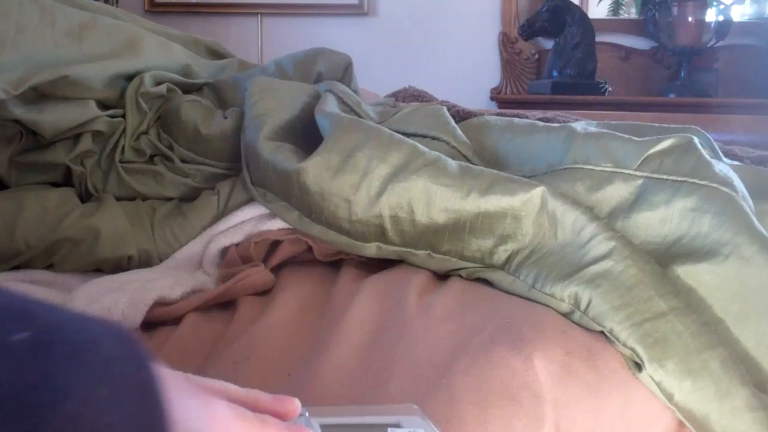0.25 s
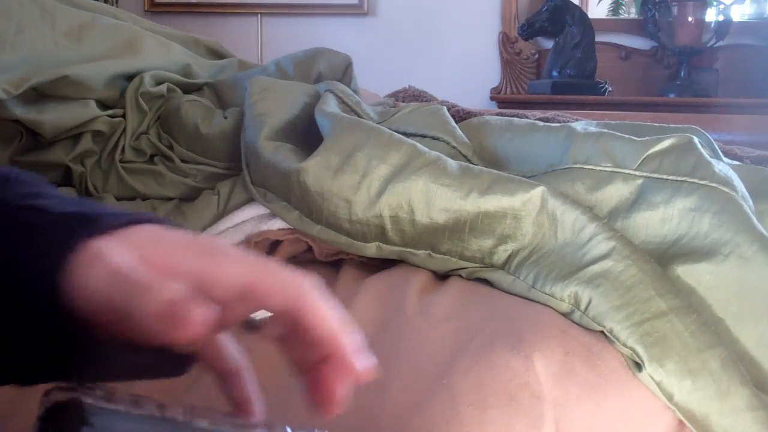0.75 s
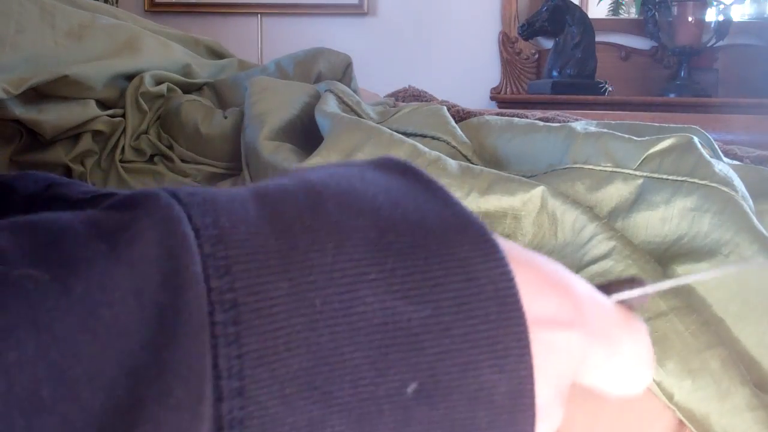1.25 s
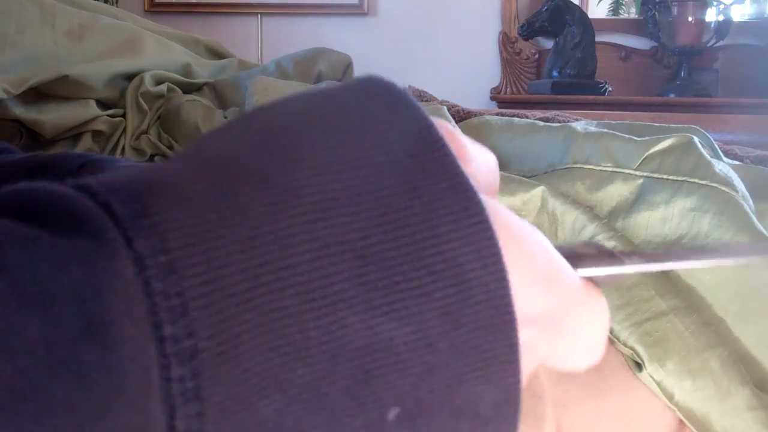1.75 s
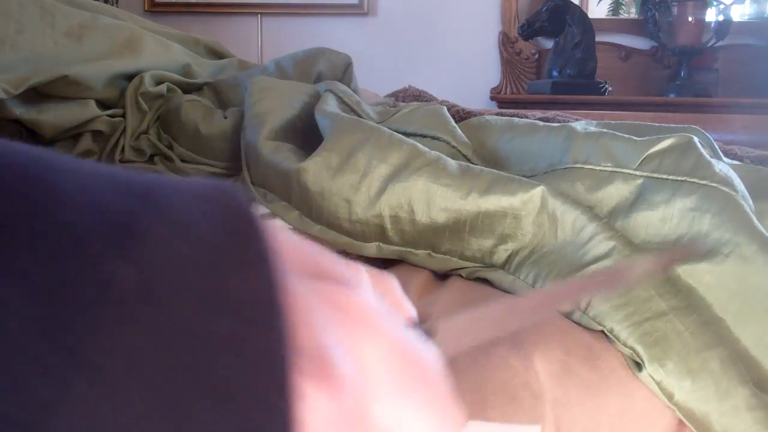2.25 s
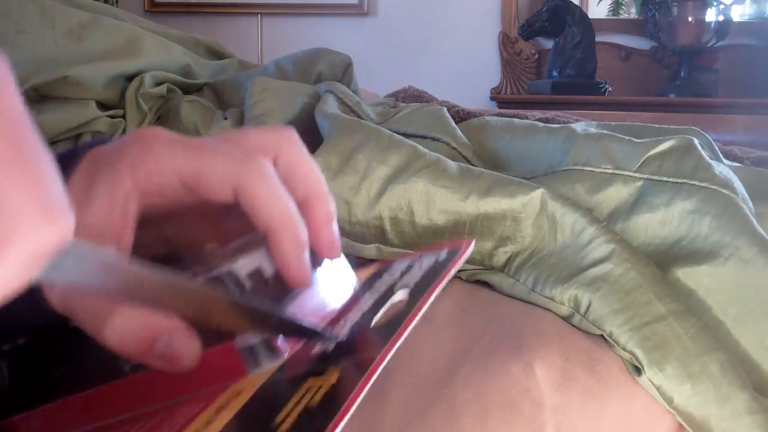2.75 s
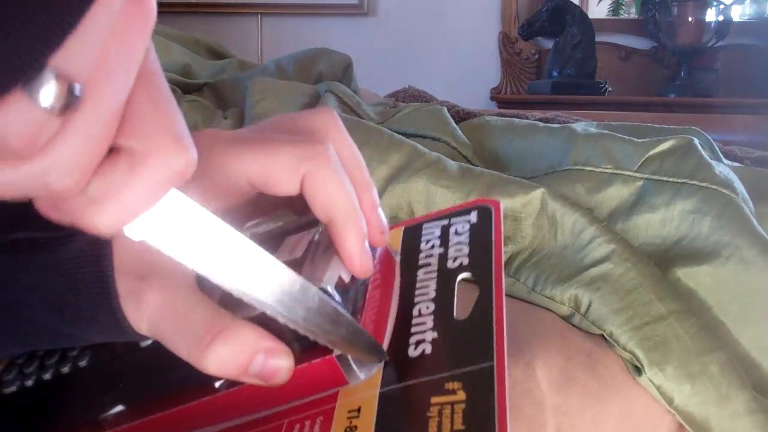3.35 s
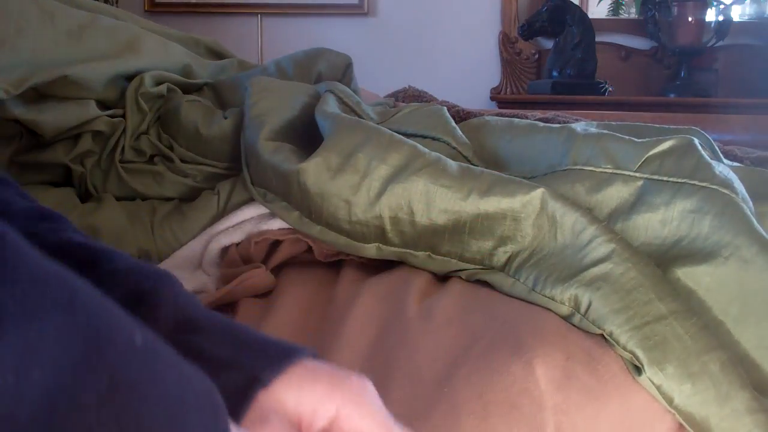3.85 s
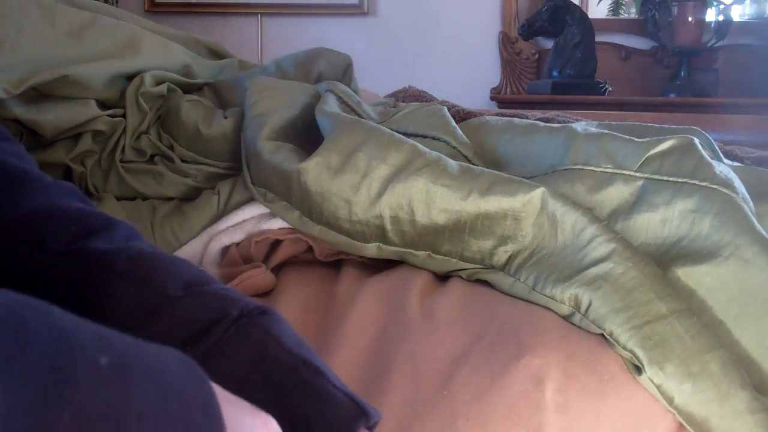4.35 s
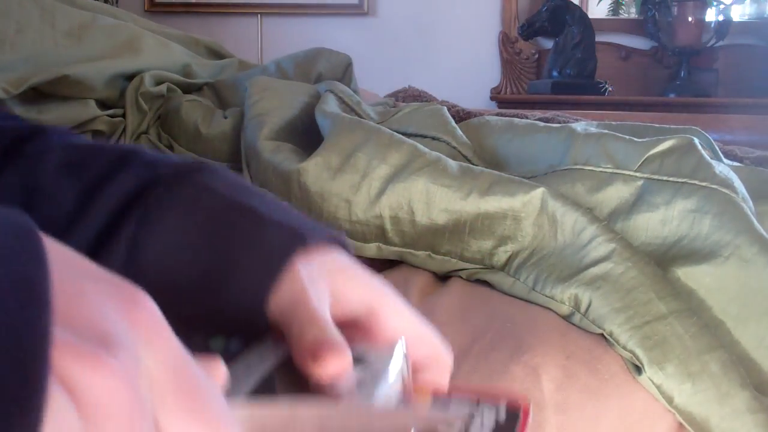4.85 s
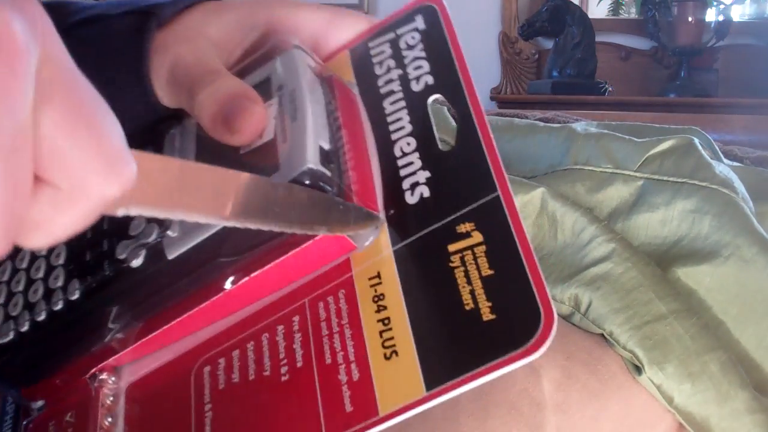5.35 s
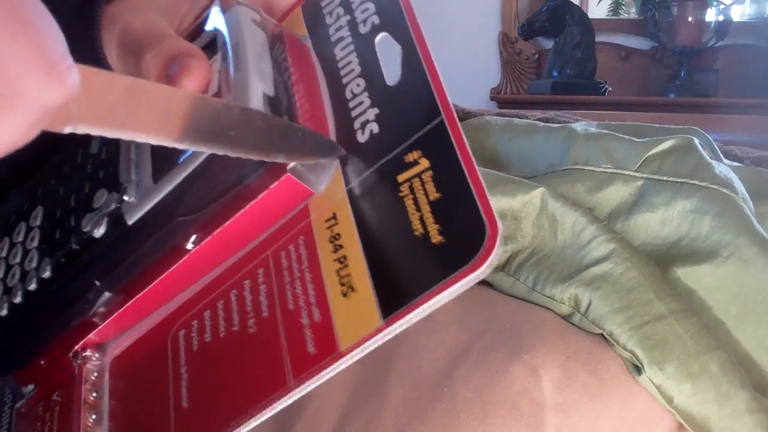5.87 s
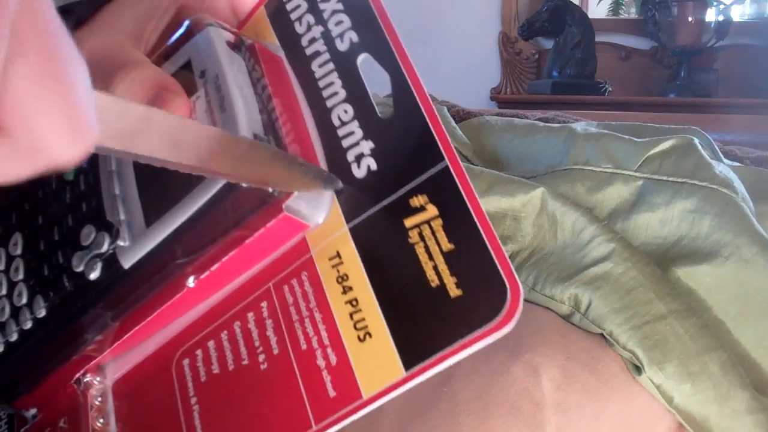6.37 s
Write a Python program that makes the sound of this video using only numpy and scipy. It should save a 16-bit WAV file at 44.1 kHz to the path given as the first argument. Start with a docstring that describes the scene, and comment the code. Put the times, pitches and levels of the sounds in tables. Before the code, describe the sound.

A quiet bedroom with faint steady noise, heard in close stereo. For the first half second there is only soft cloth and finger rustle. At 0.6-1.0 s stiff plastic clacks several times and begins creaking. From 1.1 to 1.5 s a serrated blade rasps over the edge in rapid, uneven ticks. Sharp snaps with a brief hollow ring come at 1.6 s, more crackling near 1.9-2.3 s. A second, tighter and louder rasp runs 2.4-2.55 s, leading straight into a crunch at 2.6 s. Irregular dry clicks and sleeve hiss continue from 2.7 to 4.3 s. The loudest crumpling bursts hit at 4.4, 4.55 and 4.8 s. Snaps cluster at 5.1-5.3 s with a dull bump, then it thins out; one hard crack with a low knock lands at 5.94 s, and smaller pops trail off to about 6.6 s.

```python
"""Opening a blister pack with a knife

A knife cuts and pries at a stiff plastic pack on a bed in a quiet bedroom, close to two microphones.
The shell snaps, creaks and crumples: bursts and tiny slips drive damped modes of card and shell.
Blade teeth pluck the gripped edge, panels ring on, and low modes sound as the pack bumps hands and bed.
Sleeves and fingers hiss as swelling banded noise, over a delay-line room and a faint steady noise floor."""
import sys
import numpy as np
from scipy import signal
from scipy.io import wavfile

SR = 44100
rng = np.random.default_rng(int(sys.argv[2]) if len(sys.argv) > 2 else 0)


def int16_out(signal):
    """Quantize to a 16-bit WAV file."""
    q = np.round(np.clip(np.atleast_2d(signal).T, -1, 1) * 32767)
    wavfile.write(sys.argv[1], SR, q.astype(np.int16))


N = 291456

# Loud snaps of the shell: (time [s], nominal peak level [dB], body re peak [dB], crack re peak [dB],
# favoured pitch [Hz])
LOUD_SNAPS = [(0.605, -27, -13, -1.5, 655), (0.708, -32.5, -30, -3, 514), (0.762, -27.5, -11.5, -22, 885),
              (0.934, -21, -10, -19, 740), (0.951, -15, -12, -11, 1290), (0.988, -22, -12.5, -8, 550),
              (0.657, -25, -20, -18, 264), (5.721, -42.5, -7, -3, 1830), (5.795, -43, -4.5, -4, 814),
              (2.77, -42.5, 6.5, -12, 640), (1.611, -16, -17.5, -8.5, 1900), (1.799, -28, -6.5, -7, 1190),
              (1.91, -24.5, -11, -12, 439), (1.924, -26, -6, 5.5, 2500), (1.971, -22, -5.5, -26, 1630),
              (1.985, -25, -11, -16, 484), (1.998, -32, -16, -30, 1200), (2.258, -26, -7, -10, 277),
              (2.279, -27, -9, -19, 456), (3.684, -31.5, -6, -7, 564), (3.866, -30, -16, 1, 1850),
              (2.608, -29, -15, -8, 773), (2.629, -14.5, -13.5, -14, 900), (2.663, -23, -18, -12, 909),
              (2.747, -28, -6.5, 0, 600), (2.796, -20, -12.5, -9, 463), (2.863, -28.5, -10.5, 3, 855),
              (2.902, -21, -20, -19, 815), (2.948, -31, -3.5, 8, 520), (3.022, -19.5, -13, -1, 2590),
              (3.204, -22.5, -19, -6.5, 644), (3.243, -22.5, -12.5, -5, 4300),
              (3.298, -23.5, -15.5, -10.5, 553), (3.369, -24, -15.5, -4, 1770),
              (3.385, -27.5, -12, -2.5, 1800), (3.412, -26, -16.5, -2, 1160),
              (3.468, -26.5, -16.5, -2.5, 1220), (3.556, -24.5, -14.5, -4.5, 503),
              (3.763, -29.5, -10, -19.5, 800), (3.783, -21, -12, -7.5, 696), (3.883, -22, -16.5, 0, 2600),
              (3.974, -25.5, -11, -2.5, 1650), (3.987, -26, -13, -24, 650), (4.134, -29, -10.5, -18, 1510),
              (4.18, -31, -9.5, -11.5, 500), (4.215, -32.5, -6.5, -19, 603), (4.249, -25.5, -7.5, -22, 540),
              (4.384, -11.5, -7.5, -39.5, 1950), (4.411, -18.5, -13, -33, 860),
              (4.526, -28.5, -7, -23, 700), (4.568, -17.5, -14, -22, 2230), (4.597, -9.5, -19.5, -6.5, 620),
              (4.633, -25, -8, -10, 1690), (4.788, -23.5, -3.5, -12, 3700), (4.8, -17.5, -21, -27, 766),
              (5.08, -34, 0.5, 3, 730), (5.135, -20.5, -25, -4.5, 2050), (5.146, -17.5, -7, -13, 557),
              (5.213, -25, -17, -1, 3060), (5.244, -29, -14, -2, 4300), (5.295, -18.5, -13, -24, 740),
              (5.3, -23, -8, -7, 1770), (5.415, -34, -14.5, -3.5, 1330), (5.588, -30.5, -15, -3.5, 1750),
              (5.673, -34, -12.5, -7, 547), (5.841, -35, -11.5, -18, 423), (5.938, -13.5, -8, -5, 1870),
              (6.058, -26.5, -13, -0.5, 1220), (6.071, -27, -15, -10, 3160), (6.111, -29, -9.5, -29, 630),
              (6.135, -26, -22, -9, 420), (6.288, -38, -17, -3.5, 620), (6.309, -25.5, -13.5, -12, 430),
              (6.356, -37.5, -30, -4, 2590), (6.371, -34.5, -8, -9, 500), (6.399, -20.5, -22.5, -15.5, 970),
              (6.578, -26.5, -62, -10, 1020)]
# Modes of card and shell: (frequency [Hz], level [dB], decay time T60 [s])
PACK_MODES = [(224, -5.5, 0.055), (277, -1, 0.033), (445, 3, 0.046), (542, -0.5, 0.064), (644, 6, 0.026),
              (815, 0.5, 0.043), (897, -8, 0.1), (1040, -2, 0.027), (1234, -2.5, 0.031),
              (1690, 0.5, 0.0092), (2037, -2.5, 0.02), (2570, -0.5, 0.014), (3250, 5.5, 0.0044),
              (4300, 11, 0.003), (5640, 6, 0.0041), (6340, 2, 0.011), (8690, 9.5, 0.0014),
              (12740, 14.5, 0.0012)]
# Bending of the shell, as the level of its steady creak: (time [s], level [dB])
BEND_CURVE = [(0, -59), (0.4, -61), (0.79, -46), (0.91, -55.5), (1.1, -46.5), (1.45, -40), (1.56, -51),
              (1.8, -43), (2.18, -50.5), (2.42, -41), (2.58, -51.5), (3.01, -48), (3.13, -62), (3.5, -63),
              (3.68, -47.5), (4.35, -49), (4.73, -50), (4.93, -55.5), (5.3, -55), (5.4, -59.5), (5.92, -66),
              (6.13, -53), (6.61, -52.5)]
# Crumples, surges of creaking; swell and fade span 20 dB:
# (peak time [s], level [dB], swell [s], fade [s], favoured pitch [Hz])
CRUMPLE_SURGES = [(0.95, -30.5, 0.039, 0.45, 1230), (1.625, -33, 0.051, 0.4, 900),
                  (1.98, -29, 0.07, 0.086, 1700), (2.645, -25, 0.037, 0.075, 960),
                  (2.91, -30.5, 0.044, 0.11, 840), (3.574, -34.5, 0.075, 0.031, 504),
                  (3.89, -34.5, 0.097, 0.079, 800), (4.387, -18, 0.044, 0.046, 1850),
                  (4.44, -28.5, 0.055, 0.07, 515), (4.556, -12, 0.024, 0.041, 2300),
                  (4.804, -16, 0.026, 0.056, 1830), (5.155, -31, 0.13, 0.084, 700),
                  (5.95, -36.5, 0.012, 0.12, 800)]
# Serrated blade catching and slipping on the edge: (time [s], nominal peak level [dB], crack re peak [dB])
TOOTH_CATCHES = [(1.136, -25, -17), (1.16, -21.5, -16), (1.179, -22.5, -10), (1.184, -25.5, -16),
                 (1.196, -23, -10), (1.213, -25, -10), (1.26, -24.5, -16), (1.27, -22, -12),
                 (1.282, -23, -9.5), (1.291, -26, 0), (1.3, -21.5, -6), (1.315, -19.5, -4), (1.341, -24, 1),
                 (1.351, -21.5, -18), (1.362, -37, -8), (1.374, -22.5, 0.5), (1.395, -21, -1.5),
                 (1.406, -21.5, -4), (1.427, -20.5, -9.5), (1.459, -32, 2), (1.47, -23.5, -1.5),
                 (1.498, -24.5, -1.5), (1.511, -30, -4), (2.374, -21, -4), (2.387, -21, -3),
                 (2.405, -18, -5), (2.421, -17, -5), (2.443, -18, -4), (2.466, -20, -1), (2.473, -27.5, 5),
                 (2.495, -18, -1.5), (2.554, -16.5, 0)]
# Modes of the gripped edge before random detuning: (frequency [Hz], level [dB], decay time T60 [s])
EDGE_MODES = [(431, -12, .06), (550, -8, 0.02), (684, -12, 0.022), (1175, -7.5, .018), (1524, -3.5, 0.0037),
              (2600, -11.5, 0.015), (4270, 0, 0.0026), (6240, -7, 0.0044), (11150, -2.5, 0.0009)]
# Panels left ringing, at a pitch set by the grip:
# (time [s], frequency [Hz], nominal level [dB], decay time T60 [s])
PANEL_RINGS = [(1.612, 914, -27.5, 0.095), (1.667, 445, -27, 0.093), (2.631, 431, -31, 0.13),
               (2.634, 915, -25.5, 0.096), (2.903, 832, -33, .1), (4.565, 438, -27, 0.2),
               (4.803, 773, -28.5, .15), (5.298, 707, -27.5, 0.055), (5.94, 442, -36, 0.16),
               (5.955, 764, -44, 0.14), (6.401, 1002, -38, 0.12)]
# Bumps of the pack against hands and bed: (time [s], nominal peak level [dB])
PACK_BUMPS = [(1.659, -36.5), (4.801, -39), (5.146, -39.5), (5.297, -32), (5.938, -26.5), (6.312, -45.5)]
# Low modes those bumps excite: (frequency [Hz], level [dB], decay time T60 [s])
LOW_MODES = [(62.3, -18, 0.26), (153, -20, 0.21), (276.6, 3, 0.075)]
# Strokes of sleeves and fingers; swell and fade span 20 dB:
# (peak time [s], nominal level [dB], swell [s], fade [s], brightness [dB per octave])
SLIDE_STROKES = [(0.001, -54, 0.083, 0.21, 3), (0.491, -47, 0.098, 0.57, 2),
                 (0.784, -43, 0.071, 0.21, -1.5), (0.97, -44.5, 0.038, 0.32, -1),
                 (1.167, -45, 0.083, 0.17, 1), (1.614, -40.5, 0.0082, 0.087, 4),
                 (1.79, -42, 0.23, 0.13, -1), (2.005, -42.5, 0.31, 0.19, -1.5),
                 (2.244, -44, 0.069, 0.6, -0.5), (2.634, -41.5, 0.04, 0.11, -2.5),
                 (2.907, -36, 0.066, 0.16, 0), (3.019, -38.5, 0.73, 0.037, 1),
                 (3.376, -55.5, 0.63, 0.59, 0), (3.6, -48.5, 0.25, 0.3, -1), (3.891, -40, 0.2, .12, -0.6),
                 (4.132, -40.5, 0.25, 0.061, 1.5), (4.274, -45, 0.07, 0.92, 0),
                 (4.448, -39.5, 0.33, 0.15, 0.8), (4.568, -47.5, 0.15, 0.26, -1),
                 (4.819, -43.5, 0.1, 0.048, 3), (5.075, -45.5, 0.026, 0.36, 2.5),
                 (5.191, -35, .16, 0.04, 1.5), (5.262, -45, 0.14, 0.061, 0.5), (6.064, -54, .027, 0.13, -1),
                 (6.5, -58.5, 0.37, 2.7, 1.5)]
# Spectrum of the sliding hiss: (frequency [Hz], density [dB per Hz])
SLIDE_SPECTRUM = [(470, -36), (800, -7), (2060, -7), (7420, -13), (14000, -12)]
# Spectrum of the room's floor: (frequency [Hz], density [dB per Hz])
FLOOR_SPECTRUM = [(15, -16), (25, -10), (65, -8.5), (155, -7), (220, -11.5), (430, -10.5), (950, -14),
                  (2200, -16.5), (8000, -18.5), (11300, -18.5), (14000, -12.5)]
# Left-right likeness of the near sounds: (frequency [Hz], likeness [0 to 1])
NEAR_LIKENESS = [(60, 0.56), (180, 0.98), (550, 1), (1640, 0.92), (4960, 0.67), (15000, 0.21)]
# Left-right likeness of the floor: (frequency [Hz], likeness [0 to 1])
ROOM_LIKENESS = [(60, 0.89), (240, 0.27), (950, 0.37), (3760, 0.027), (15000, 0.037)]
# Left-right level difference: (frequency [Hz], left re right [dB])
LEFT_RIGHT_BALANCE = [(180, 3), (550, 2), (1640, 0.5), (4960, 1), (15000, -3)]

BURST_MS = 1.09     # release scale of a snap whose crack equals its peak
DULL_DB_PER_DOUBLING = 17     # this much less crack doubles the release time
RATTLE_S, RATTLE_DB = .012, -9     # decay constant; level at 700 Hz
FAVOUR_DB, FAVOUR_OCTAVES = 8.5, 0.27     # lift at a snap's favoured pitch, and its width
MODES_LOW_CUT_HZ = 142     # high-pass against low-frequency leakage of the modal filters; doubled for catches
SMALL_PER_S, BUSY_BEND_DB = 30, -46     # small snaps come at this rate at this bend
SMALL_OVER_BEND_DB, SMALL_SPREAD_DB = 10, 3     # size scatters up to twice the spread each way
SMALL_BODY_DB, SMALL_CRACK_DB, SMALL_LOW_HZ, SMALL_HIGH_HZ = -9, -20, 420, 1500
SETTLE_DB, SETTLE_RISE_S, SETTLE_FALL_S = -2, 0.0045, 0.033     # creak after a loud snap, re its body
SLIPS_PER_S = 880     # median rate
CREAK_DULLNESS_DB = 1.5     # loss per octave above 700 Hz
CRUMPLE_FALL_DB, CRUMPLE_FLUTTER_DB = 7.5, 3     # loss one octave from the favoured pitch; unevenness
EDGE_TRAVEL_MS = 1.6     # bending-wave delay at 1 kHz; lower pitches take longer
EDGE_DETUNE = .05     # share by which each pluck randomly raises or lowers each mode
CHATTER_DB, CHATTER_MS = -23, 4.9     # re the pluck, at 2500 Hz and above; decay constant
RING_WOBBLE_DB = 4.5
ROOM_T60_S, ROOM_DB, WALL_CUT_HZ = 0.16, -20.5, 11000
FLOOR_DB = -52
MIC_TOP_HZ, CUTOFF_HZ = 14250, 15552


def pack(snaps, creak_db):
    """Modal excitation: snaps and stick-slips drive the same card and shell modes, each in its own colour."""
    s, peak_db, body_db, crack_db, favoured_hz = snaps.T
    grains = from_db(-31.0) * slips()
    release, rattle = snap_bursts(crack_db)
    # slips of a crumple are too dense to count, so they are noise
    crush = from_db(CRUMPLE_FLUTTER_DB * drift(99) - 33.0) * rng.standard_normal((2, N))
    luck_db = rng.normal(0, 1.5, (len(s), len(PACK_MODES)))     # a snap lands nearer some modes than others
    at = (s * SR).astype(int)
    out = 0
    for k, (hz, level_db, t60) in enumerate(PACK_MODES):
        low, high = np.clip(np.log2([1300 / hz, hz / 2500]), 0, 1)     # share of body and crack colour
        near_db = FAVOUR_DB * favour(hz, favoured_hz, FAVOUR_OCTAVES)     # where the shell gives way
        colour_db = low * body_db + high * crack_db + near_db + luck_db[:, k]
        strength = from_db(peak_db + colour_db - 8.5)
        # every release reaches every mode about equally
        push = np.abs(release @ np.exp(-2j * np.pi * hz / SR * np.arange(release.shape[2])))
        jolt = release / np.maximum(push, .6)[..., None]
        octaves = np.log2(hz / 700)
        shapes = jolt + from_db(RATTLE_DB - 2 * octaves) * rattle     # the rattle is dull
        drive = click_train(at, strength, shapes)
        creaking = from_db(creak_db) * grains + from_db(crumpling(hz)) * crush
        drive += from_db(-CREAK_DULLNESS_DB * octaves) * creaking
        out = out + (-1) ** k * from_db(level_db) * to_stereo(ring(drive, hz, t60), NEAR_LIKENESS, hz)
    return filtered(signal.butter(3, MODES_LOW_CUT_HZ, "high", fs=SR, output="sos"), out)


def snap_bursts(crack_db):
    """Impulsive release: a quick burst frees the shell and the loose card rattles on; each has energy 1."""
    after = np.arange(2000)
    burst_ms = BURST_MS * 2 ** (-crack_db / DULL_DB_PER_DOUBLING)
    burst = after / (burst_ms[:, None, None] * SR / 3000)     # the rise takes a third of the burst
    noise = rng.standard_normal((len(crack_db), 2, 2, len(after)))
    release = noise[:, 0] * burst * np.exp(-burst)
    rattle = noise[:, 1] * np.exp(-after / (RATTLE_S * SR))
    return [b / np.sqrt(np.sum(b ** 2, axis=2, keepdims=True)) for b in (release, rattle)]


def favour(hz, favoured_hz, octaves):
    """Selective response: 1 at the favoured pitch, falling as a bell over octaves to both sides."""
    return np.exp(-(np.log2(hz / favoured_hz) / octaves) ** 2)


def small_snaps(bend_db):
    """Random buckling: the harder the bend, the more frequent and louder the snaps; rows as for loud ones."""
    s, keep, place, size = rng.random((400, 4)).T * [[N / SR], [1], [1], [1]]
    bend = bend_db[(s * SR).astype(int)]
    peak_db = bend + SMALL_OVER_BEND_DB + SMALL_SPREAD_DB * (4 * size - 2)
    favoured_hz = SMALL_LOW_HZ * (SMALL_HIGH_HZ / SMALL_LOW_HZ) ** place
    rows = np.transpose([s, peak_db, SMALL_BODY_DB + 0 * s, SMALL_CRACK_DB + 0 * s, favoured_hz])
    return rows[keep * len(s) * SR / N < SMALL_PER_S * from_db(bend - BUSY_BEND_DB)]


def slips():
    """Stick-slip friction: the bent shell yields in tiny steps, clumped in time and uneven in size."""
    born = rng.random(N) < SLIPS_PER_S * from_db(3.0 * drift(40)) / SR
    return rms_one(born) * rng.standard_normal((2, N))


def creak(bend_db):
    """Power addition: creak level [dB] of steady bending plus the settling after each loud snap."""
    settling = [(s + SETTLE_RISE_S, db + body_db + SETTLE_DB, SETTLE_RISE_S, SETTLE_FALL_S)
                for s, db, body_db, *_ in LOUD_SNAPS]
    return 10 * np.log10(from_db(2 * bend_db) + from_db(2 * swells(settling)))


def crumpling(hz):
    """Selective excitation: level [dB] at which the crumples drive a mode, less far from their own pitch."""
    return swells([(s, db - CRUMPLE_FALL_DB * np.log2(hz / own_hz) ** 2, swell_s, fade_s)
                   for s, db, swell_s, fade_s, own_hz in CRUMPLE_SURGES])


def catches():
    """Dispersion of bending waves: each tooth plucks and chatters on the edge, and the highs arrive first."""
    s, peak_db, crack_db = np.transpose(TOOTH_CATCHES)
    luck = rng.standard_normal((len(s), len(EDGE_MODES), 3))
    after = np.arange(800)
    noise = rng.standard_normal((len(s), 2, len(after)))
    chatter = from_db(CHATTER_DB) * noise * np.exp(-after / (CHATTER_MS * SR / 1000))
    out = 0
    for k, (hz, level_db, t60) in enumerate(EDGE_MODES):
        at = ((s + EDGE_TRAVEL_MS / 1000 * np.sqrt(1000 / hz)) * SR).astype(int)
        high = np.clip(np.log2(hz / 2000), 0, 1)     # share of crack colour
        strength = from_db(peak_db + level_db + high * crack_db + luck[:, k, 0])
        shapes = chatter * min(hz / 2500, 1)     # the chatter is bright
        shapes[:, 0, 0] = 1
        shapes[:, 1, int(SR / hz / 4)] = luck[:, k, 1]     # side signal, a quarter turn later
        for way in (-1, 1):     # each mode is randomly lower or higher
            drive = click_train(at, strength * (np.sign(luck[:, k, 2]) == way), shapes)
            tone = ring(drive, hz * (1 + way * EDGE_DETUNE), t60)
            out = out + (-1) ** k * to_stereo(tone, NEAR_LIKENESS, hz)
    return filtered(signal.butter(2, 2 * MODES_LOW_CUT_HZ, "high", fs=SR, output="sos"), out)


def rings():
    """Free vibration: a panel lingers at its own pitch, a little unsteady in the hand."""
    out = 0
    for s, hz, db, t60 in PANEL_RINGS:
        click = np.zeros(N)
        click[round(s * SR)] = from_db(db)
        tone = to_stereo([ring(click, hz, t60), 0], NEAR_LIKENESS, hz)
        out = out + tone * from_db(RING_WOBBLE_DB * drift(27))
    # the band-pass softens the start
    return filtered(signal.butter(2, [250, 1600], "band", fs=SR, output="sos"), out)


def bumps():
    """Impact: soft pushes set a few low damped modes ringing under hard jerks of the knife."""
    clicks = np.zeros(N)
    clicks[[round(s * SR) for s, db in PACK_BUMPS]] = from_db(np.array(PACK_BUMPS)[:, 1])
    out = sum(from_db(db) * to_stereo([ring(clicks, hz, t60), 0], NEAR_LIKENESS, hz)
              for hz, db, t60 in LOW_MODES)
    return filtered(signal.butter(2, 50, "high", fs=SR, output="sos"), out)


def sliding():
    """Sliding friction: cloth and skin hiss over the pack, each stroke brighter or duller."""
    level_db = swells([row[:4] for row in SLIDE_STROKES])
    tilted_db = swells([(s, db + tilt, swell_s, fade_s) for s, db, swell_s, fade_s, tilt in SLIDE_STROKES])
    hiss = banded_noise(SLIDE_SPECTRUM, NEAR_LIKENESS, patchy_db=1.5, flicker_hz=55,
                        tilt_db=tilted_db - level_db)
    return from_db(level_db + 6.5) * hiss


def bedroom(x):
    """Reverberation: six feedback delays a side, duller on every round, stepped block by block."""
    out, dull = np.zeros((2, N)), np.exp(-2 * np.pi * WALL_CUT_HZ / SR)
    for k, lag in enumerate((np.geomspace(.011, .037, 12) * SR).astype(int)):
        loop, gain, state = x.copy(), from_db(-60 * lag / SR / ROOM_T60_S), [0.]
        for i in range(lag, N, lag):
            back, state = signal.lfilter([gain * (1 - dull)], [1, -dull], loop[i - lag:i], zi=state)
            loop[i:i + lag] += back[:N - i]
        out[k % 2] += (loop - x) * (-1) ** (k // 2)     # echoes only, with mixed signs
    return out


def room_floor():
    """Diffuse background: nearly steady noise, mostly unrelated between left and right above the bass."""
    return from_db(FLOOR_DB) * banded_noise(FLOOR_SPECTRUM, ROOM_LIKENESS, patchy_db=.25, flicker_hz=8)


def banded_noise(spectrum, likeness, patchy_db, flicker_hz, tilt_db=0):
    """Band synthesis: half-octave bands of stereo noise, each with its own level and flicker; rms 1."""
    out, together, edges = 0, drift(flicker_hz), 20 * 2 ** np.arange(0, 10.1, .5)
    white = rng.standard_normal((2, 2, N))     # neighbouring bands get unrelated noise
    for k, (low, high) in enumerate(zip(edges, edges[1:])):
        hz = np.sqrt(low * high)
        if spectrum[0][0] < hz:
            band = filtered(signal.butter(2, [low, high], "band", fs=SR, output="sos"), white[k % 2])
            flicker_db = patchy_db * (together + 1.38 * drift(flicker_hz))
            gain = from_db(at_hz(spectrum, hz) + tilt_db * np.log2(hz / 4000) + flicker_db)
            out = out + gain * to_stereo(band, likeness, hz)
    return rms_one(out)


def ring(clicks, hz, t60):
    """Damped resonance: a unit click sets a decaying sine of height about 1 ringing."""
    r, w = from_db(-60 / (t60 * SR)), 2 * np.pi * hz / SR
    return signal.lfilter([0, np.sin(w)], [1, -2 * r * np.cos(w), r * r], clicks + 1e-18)


def click_train(at, strengths, shapes):
    """Superposition: lay each shape at its sample with its strength."""
    out = np.zeros((2, N + shapes.shape[2]))
    for i, gain, shape in zip(at, strengths, shapes):
        out[:, i:i + shapes.shape[2]] += gain * shape
    return out[:, :N]


def swells(rows):
    """Power sum [dB] of swells that rise to a peak and fade, straight in dB."""
    t, power = np.arange(0, N, 40) / SR, 1e-9
    for s, db, swell_s, fade_s in rows:
        below_db = 20 * np.maximum((s - t) / swell_s, (t - s) / fade_s)
        power = power + from_db(db - below_db) ** 2
    return np.interp(np.arange(N) / SR, t, 10 * np.log10(power))


def to_stereo(mid_side, likeness, hz):
    """Mid-side mixing: two unrelated signals become left and right, as alike and balanced as this pitch."""
    sign = np.array([[1], [-1]])
    alike = np.clip(at_hz(likeness, hz), 0, 1)
    pair = np.sqrt(1 + alike) * mid_side[0] + np.sqrt(1 - alike) * mid_side[1] * sign
    return pair * from_db(at_hz(LEFT_RIGHT_BALANCE, hz) / 2 * sign) / np.sqrt(2)


def drift(rate):
    """Low-pass noise, rms 1: chance values at every 40th sample pass through a double one-pole filter."""
    r = np.exp(-80 * np.pi * rate / SR)
    slow = signal.lfilter([1], [1, -2 * r, r * r], rng.standard_normal(N // 40 + 2002))[2000:]
    return np.interp(np.arange(N) / 40, np.arange(len(slow)), rms_one(slow))


def at_hz(points, hz):
    """Interpolation of a table on a log-frequency axis."""
    return np.interp(np.log(hz), np.log(np.array(points)[:, 0]), np.array(points)[:, 1])


def filtered(sections, x):
    """Linear filtering by second-order sections."""
    return signal.sosfilt(sections, x)


def from_db(db):
    """Decibels to amplitude gain."""
    return 10 ** (np.asarray(db) / 20)


def rms_one(x):
    """Normalization to rms 1."""
    return x / np.sqrt(np.mean(x ** 2) + 1e-20)


def scene():
    """Superposition of the pack, its echo in the room, bumps, sliding cloth and skin, and the floor."""
    bend_s, bend_points_db = np.transpose(BEND_CURVE)
    bend_db = np.interp(np.arange(N) / SR, bend_s, bend_points_db)
    snaps = np.vstack([LOUD_SNAPS, small_snaps(bend_db)])
    near = pack(snaps, creak(bend_db)) + catches() + rings()
    direct = near + bumps() + sliding()
    direct = np.array([direct[0], np.roll(direct[1], 1)])     # a sample nearer the left microphone
    return direct + from_db(ROOM_DB) * bedroom(near.mean(axis=0)) + room_floor()


def record(dry):
    """Band limiting: the response drops sharply above the microphone's top band and ends at the cut-off."""
    top = filtered(signal.ellip(8, .5, 26, MIC_TOP_HZ, fs=SR, output="sos"), dry)
    return filtered(signal.cheby2(12, 70, CUTOFF_HZ * 1.04, fs=SR, output="sos"), top)


dry = scene()
out = record(dry)
int16_out(out)
```